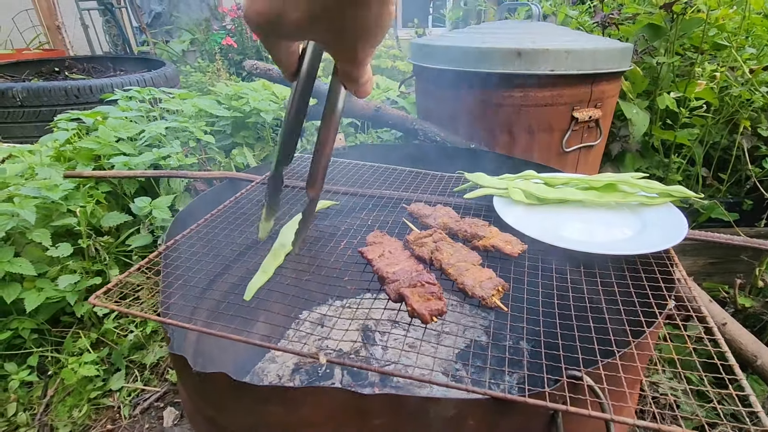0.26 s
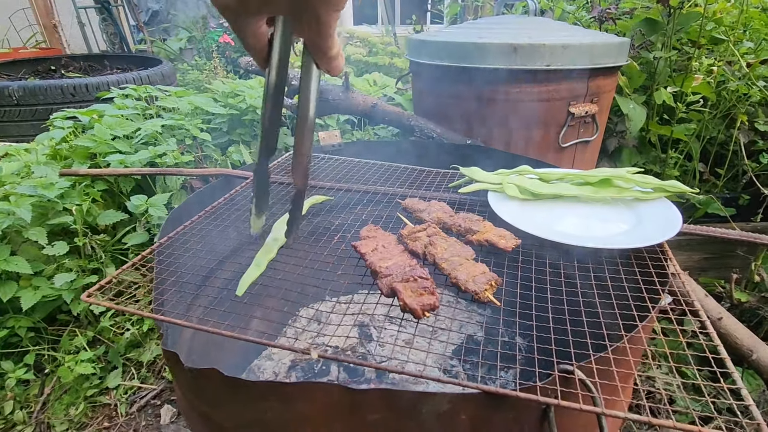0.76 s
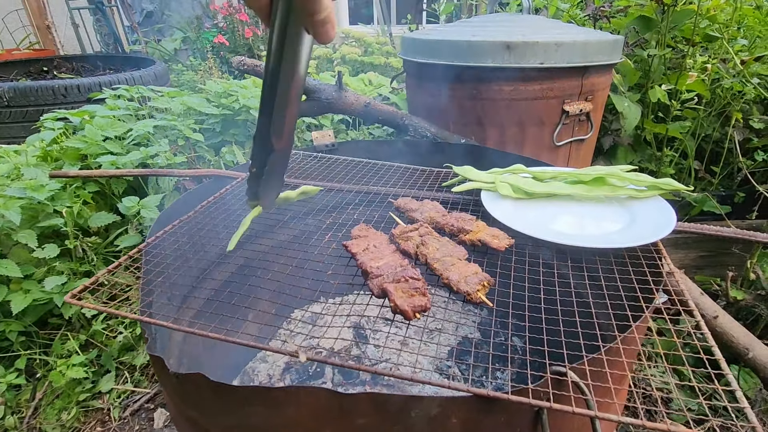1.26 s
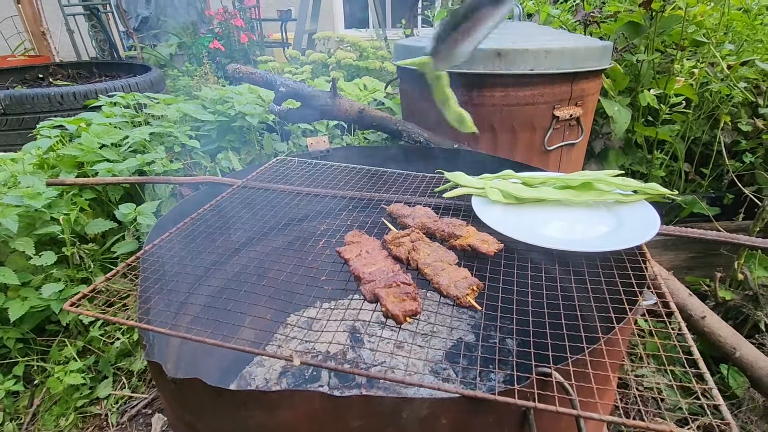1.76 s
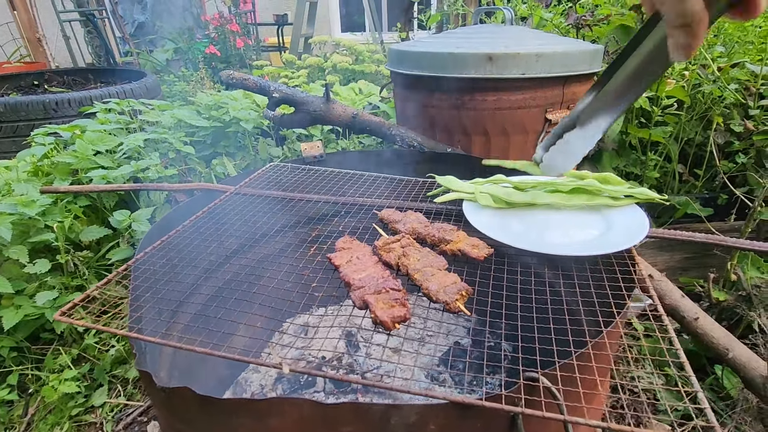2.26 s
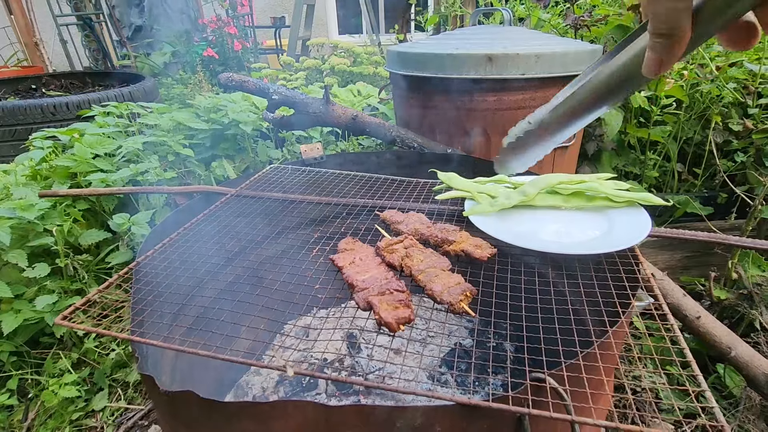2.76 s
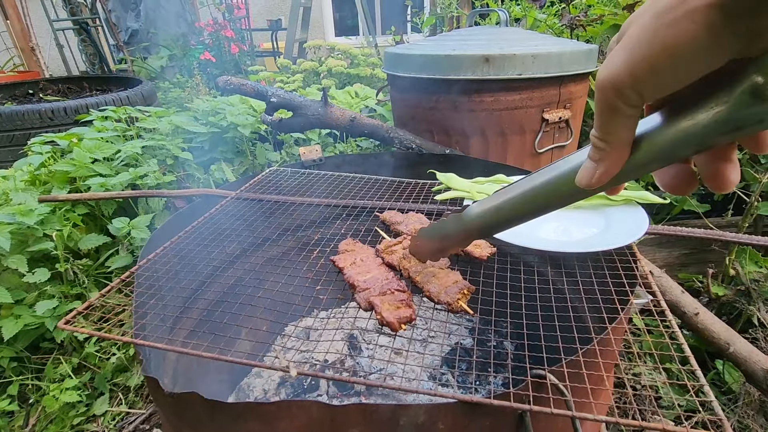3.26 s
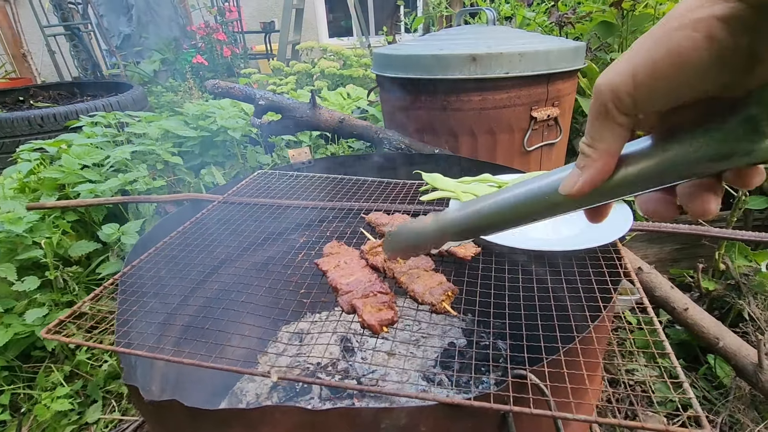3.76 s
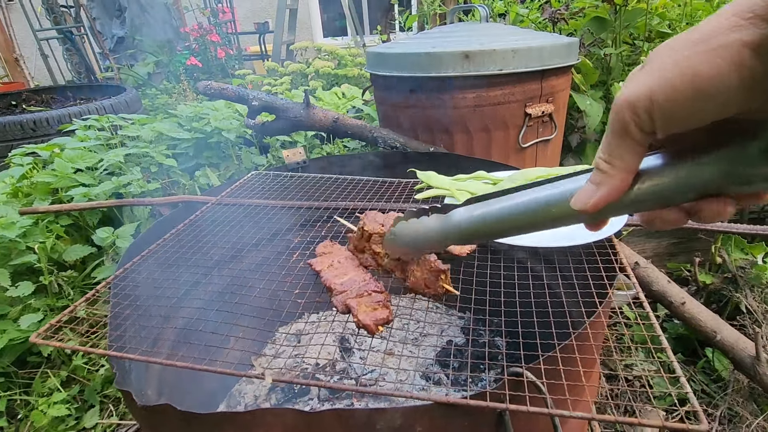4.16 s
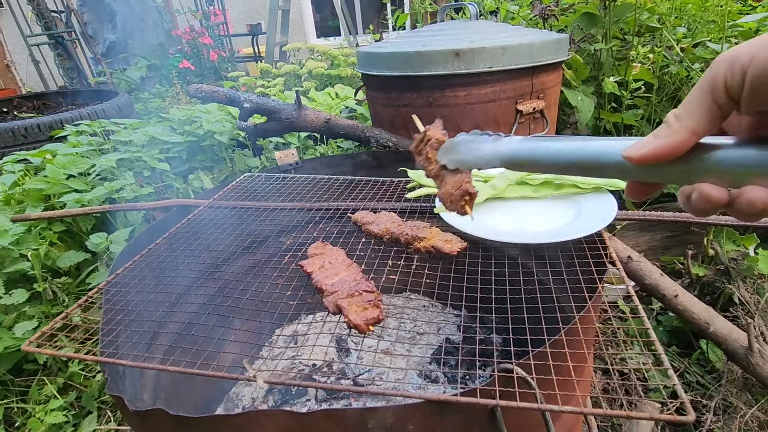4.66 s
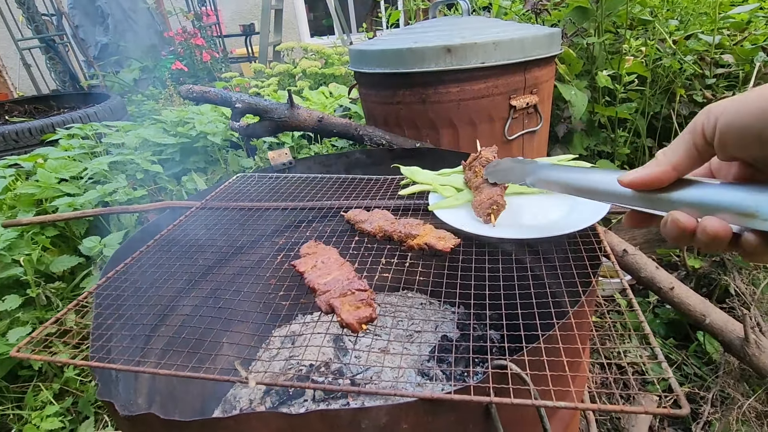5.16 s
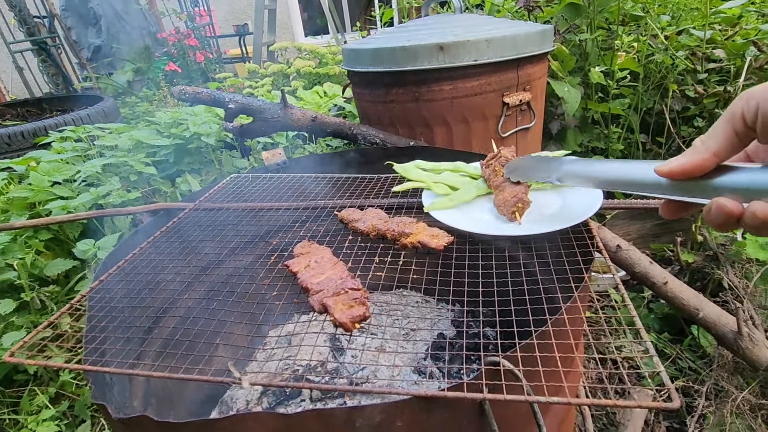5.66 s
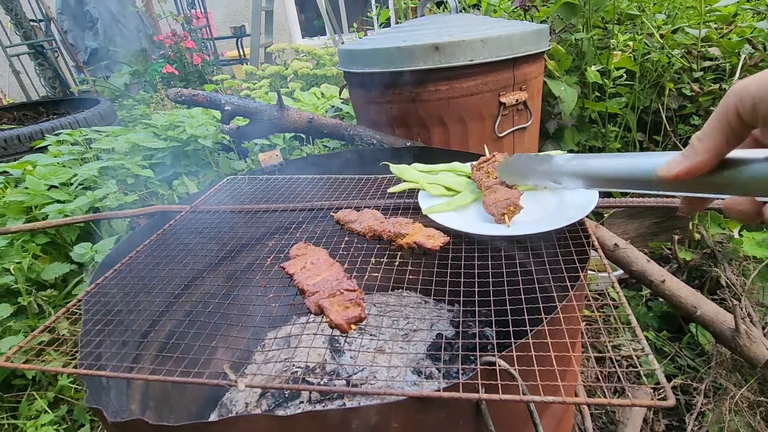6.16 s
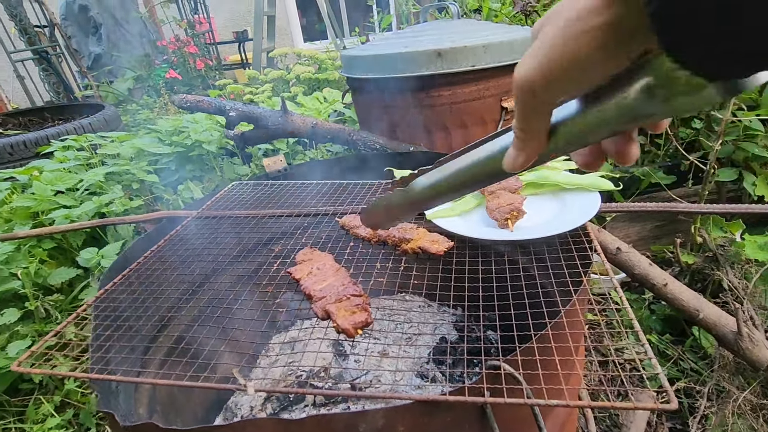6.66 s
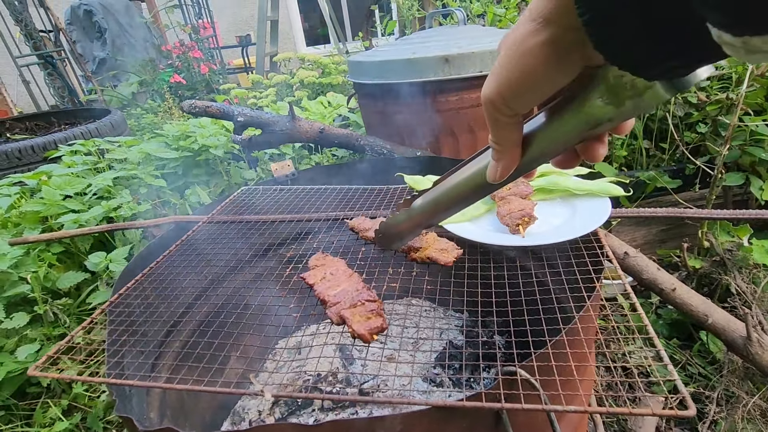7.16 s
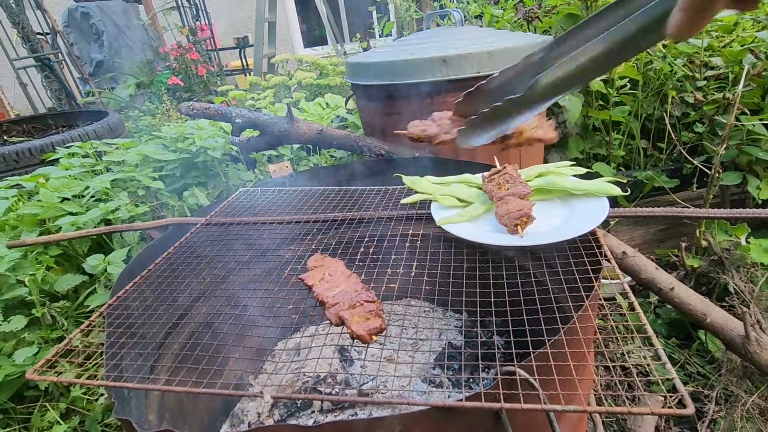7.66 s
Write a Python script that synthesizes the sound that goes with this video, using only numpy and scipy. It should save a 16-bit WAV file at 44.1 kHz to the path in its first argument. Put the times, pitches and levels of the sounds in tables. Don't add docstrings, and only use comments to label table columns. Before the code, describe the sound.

Close in a garden, steel tongs strike a wire rack with a sharp rattling clank, then a second cluster of knocks and jingles, the barrel below booming briefly. Later come a crisp tong clap, light scrapes on wires, two bright plate taps and more scraping. A low hum with a regular faint tick runs underneath, with soft rustling, crickets and distant traffic.

```python
import sys
import numpy as np
from scipy import signal
from scipy.fft import rfft, irfft
from scipy.io import wavfile
from scipy.ndimage import uniform_filter1d

SR = 44100
rng = np.random.default_rng(int(sys.argv[2]) if len(sys.argv) > 2 else 0)


def invert_db(x):
    u = np.asarray(x, float) / 20
    return 10 ** u


def store_pcm(level_fs):
    pcm = np.round(np.clip(level_fs, -1, 1) * 32767).astype(np.int16)
    wavfile.write(sys.argv[1], SR, np.atleast_2d(pcm).T)


N = 349272

# (time [s], blow level [dB], thud re blow [dB], sparkle re blow [dB], rattle t60 [s])
RACK_BLOWS = [(0.193, -40.5, -8, -11, 0.15), (0.204, -39.5, -4, -14, 0.081),
              (0.222, -25.5, -2, -16.5, 0.14), (0.3, -46.5, 8, -37, 0.5), (0.7277, -45.5, 3, -22, 0.11),
              (.92, -53, 0, -10, 0.42), (0.708, -42, 3, -44, 0.12), (0.7469, -40.5, -2.5, -17, 0.27),
              (0.7825, -30, -4, -15.5, 0.14), (0.83, -42, 4.5, -37, 0.32), (0.8688, -43.5, 5.5, -30, 0.25),
              (0.959, -45.5, -1, -5, 0.16), (0.978, -44, -2, -11, 0.17), (0.808, -38, 2, -26, 0.098),
              (1.005, -49, -9, -31, 0.15), (.25, -36, -5, -29, 0.17), (.895, -52.5, 3, -20, 0.19)]
# (frequency [Hz], level [dB], t60 [s])
RACK_MODES = [(958, -2, 0.27), (1184, -20, 5.0), (1696, -9, 0.26), (2099, -9, 0.37), (2218, -12, 0.37),
              (2379, -12, 0.41), (2632, 0, 0.1), (2923, -7, 0.36), (3138, -3, 0.15), (3445, -2, 0.17),
              (4398, -14, 0.28), (4635, -6, 0.14), (5023, -7, 0.13), (5679, -7, 0.14), (6056, -11, 0.12),
              (6982, -16, 0.16), (7590, -15, 0.15), (8554, -29, 0.21), (9119, -24, 0.12), (9318, -23, 0.12),
              (9706, -21, 0.084), (9862, -29, 0.19)]
# (frequency [Hz], level [dB], t60 [s])
TONG_MODES = [(4790, -5, 5.0), (5518, -53, 5.0), (7450, -12, 0.17), (7600, -22, 0.33), (8952, -46, 0.23),
              (9700, -7, 0.082), (10360, 1, 0.12), (10950, -14, 0.032), (12010, 2.5, 0.096),
              (12390, -50, 5.0), (12900, -30, 0.16), (13460, -48, 5.0), (14700, -18, 0.071),
              (12400, -15, 0.031)]
RACK_PIVOTS_HZ = (560, 2770, 12500)
TONG_PIVOTS_HZ = (3100, 7260, 12300)
DRAG_PAN_DB = -0.3


def evened(x):
    return x / np.sqrt(np.mean(x ** 2) + 1e-20)


def read(points, hz):
    f, value = np.transpose(points)
    return np.interp(np.log(hz + 1), np.log(f + 1), value)


def follow(rows):
    s, level_db = np.transpose(rows)
    return np.interp(np.arange(N) / SR, s, level_db)


def sides(pan_db):
    return invert_db(np.array([[pan_db / 2], [-pan_db / 2]]))


def add(mix, s, sound):
    part = mix[:, round(s * SR):][:, :sound.shape[1]]
    part += sound[:, :part.shape[1]]


def placed(rows, pan_db):
    return [(*row, pan_db) for row in rows]


def fuzz(hz, width_hz):
    band_hz = [hz - width_hz / 2, hz + width_hz / 2]
    sos = signal.butter(2, band_hz, "band", fs=SR, output="sos")
    return evened(signal.sosfilt(sos, rng.standard_normal((2, N))))


def noise(spectrum, patchy_db, flicker_db):
    # (frequency [Hz], correlation [0-1])
    likeness = [(60, 1), (130, 0.89), (290, 0.77), (640, 0.016), (15000, 0.035)]
    frames, hz = N // 256 + 5, np.fft.rfftfreq(1024, 1 / SR)
    a, b, c, d, patches = rng.standard_normal((frames, 513, 5)).T
    patches = uniform_filter1d(patches, size=12, axis=0)
    patches = evened(uniform_filter1d(patches, size=12, axis=1))
    flicker = evened(uniform_filter1d(rng.standard_normal(frames), size=3))
    same = np.clip(read(likeness, hz), -1, 1)[:, None]
    left = a + 1j * b
    right = same * left + np.sqrt(1 - same ** 2) * (c + 1j * d)
    level_db = read(spectrum, hz)[:, None] + patchy_db * patches + flicker_db * flicker
    z = np.array([left, right]) * invert_db(level_db)
    return evened(signal.istft(z, nperseg=1024, noverlap=768)[1][:, :N])


def ring(modes, spread_db, longest_s, size=22050):
    hz, db, t60 = np.transpose(modes)[:, None, :, None]
    t = np.arange(size) / SR
    apart = np.minimum(hz / 2500, 1)
    luck = rng.standard_normal((2, len(modes), 1))
    phase = rng.random((2, len(modes), 1))
    fading_db = db + spread_db * apart * luck - 60 * t / np.clip(t60, .01, longest_s)
    contact = np.minimum(t / 0.002, 1)
    return contact * (invert_db(fading_db) * np.sin(2 * np.pi * (hz * t + phase * apart))).sum(1)


def strike(rows, modes, pivots_hz, longest_s, mesh_db, mesh_t60_s, chatter_per_s, size, rise_s=0):
    # (frequency [Hz], left-right [dB])
    shading = [(250, -6), (600, 5), (2000, 0), (4500, -5), (8000, -6.5), (12000, 7)]
    treble_hz, treble_share = 7200, 3.8
    out = np.zeros((2, N))
    t = np.arange(size) / SR
    hz = np.fft.rfftfreq(2 * size, 1 / SR)
    for s, db, low_db, high_db, rattle_s, pan_db in rows:
        contacts = (rng.random(size) < chatter_per_s / SR) * rng.standard_normal(size)
        contacts = contacts * invert_db(-60 * t / max(rattle_s, .004))
        contacts[0] = 1
        contacts *= np.minimum((t + .002) / (rise_s + .002), 1)

        mesh = rng.standard_normal((2, size)) * invert_db(mesh_db - 60 * t / mesh_t60_s)
        mesh = signal.lfilter(*signal.butter(1, 900, "high", fs=SR), mesh)
        apart = signal.lfilter(*signal.butter(2, 600, "high", fs=SR), 1.26 * mesh[1] - mesh[0])
        mesh[1] = mesh[0] + apart
        buzz = evened(uniform_filter1d(rng.standard_normal(size), size=130))
        mesh *= invert_db(1.5 * buzz)

        bent = np.array(modes) * [1 + .006 * rng.standard_normal(), 1, 1]
        body = ring(bent, spread_db=4.5, longest_s=longest_s, size=size)
        body = body / np.abs(body).max() + mesh
        colour_db = read([(120, low_db), *zip(pivots_hz, (low_db, 0, high_db))], hz)
        colour_db = colour_db + np.outer([.5, -.5], read(shading, hz))
        whole = rfft(body, 2 * size) * rfft(contacts, 2 * size) * invert_db(colour_db)
        treble = irfft(whole / (1 + (treble_hz / (hz + 1)) ** 4))[:, :size]
        treble_fade = invert_db(-60 * t / (treble_share * rattle_s + 0.083))
        sound = irfft(whole)[:, :size] - treble * (1 - treble_fade)
        peak_power = uniform_filter1d((sound ** 2).mean(0), size=300).max()
        sound *= invert_db(db - 6.0) / np.sqrt(peak_power)
        add(out, s, sound * sides(pan_db))
    return out


def machine():
    # (frequency [Hz], level [dB])
    shaft_tones = [(56.98, 0), (58.02, -1.6), (58.38, -6.7), (59.03, -.8)]
    # (frequency [Hz], width [Hz], level [dB])
    casing_modes = [(181.4, 14, -70), (232.1, 26.2, -62.5), (340, 101, -72.5), (713, 32, -79.5)]
    hum_hz, hum_db, overtone_db, shaft_db = 120.01, -46, -70, -59
    in_step_s = 6.625
    t = np.arange(N) / SR
    tones = invert_db(hum_db) * np.sin(2 * np.pi * hum_hz * t)
    tones += invert_db(overtone_db) * np.sin(2 * np.pi * 2 * hum_hz * t)
    for hz, db in shaft_tones:
        tones += invert_db(shaft_db + db) * np.cos(2 * np.pi * hz * (t - in_step_s))
    casing = sum(invert_db(db) * fuzz(hz, width_hz) for hz, width_hz, db in casing_modes)
    return np.sqrt(2) * tones * sides(1.0) + casing[0] + 0.13 * casing[1] * np.array([[1], [-1]])


def still_air():
    # (frequency [Hz], level per Hz [dB])
    air_spectrum = [(12, -61), (20, -18), (68, 8), (123, -8.5), (146, -17), (172, -15.5), (234, -12.5),
                    (485, -32), (698, -22.5), (802, -49), (3740, -59), (4670, -41), (8890, -99),
                    (14300, -99), (16000, -76)]
    return invert_db(-53) * noise(air_spectrum, patchy_db=1.0, flicker_db=-3.5)


def snaps(per_s, spread_db):
    size = invert_db(spread_db * np.minimum(rng.exponential(1, (2, N)), 5))
    size = size * (rng.random((2, N)) < per_s / SR)
    snap = rng.standard_normal(400) * invert_db(-60 * np.arange(400) / SR / 0.012)
    leaky = size + .5 * size[::-1]
    return evened(np.diff(signal.oaconvolve(leaky, snap[None], axes=1))[:, :N])


def rustle():
    # (time [s], level [dB])
    arm_effort = [(0, -78.5), (.45, -74), (.66, -87), (1.1, -76), (1.65, -75), (2.0, -81.5), (2.2, -73.5),
                  (2.45, -82.5), (2.85, -80), (3.6, -86), (4.4, -82.5), (4.68, -75.5), (5.2, -88.5),
                  (5.55, -82), (5.85, -86.5), (6.2, -74.5), (7.0, -79.5), (7.92, -75)]
    # (frequency [Hz], level [dB])
    top_spectrum = [(900, -53), (2500, -26), (5500, -0.5), (8000, 5.5), (9000, 1.5), (15000, 2.5),
                    (16000, -51)]
    body_spectrum = [(500, -41.5), (1500, -6), (3500, -7.5), (6000, -10.5), (9000, -27)]
    rest_db, rest_body_db, body_share = -77.5, -74.5, 0.78
    top_db = follow(arm_effort)
    body_db = rest_body_db + body_share * (top_db - rest_db)
    out = invert_db(top_db + 2.0) * noise(top_spectrum, patchy_db=2.0, flicker_db=2.5) * sides(1.17)
    out += invert_db(top_db - 21.5) * snaps(per_s=73, spread_db=-6.0)
    out += invert_db(body_db + 3.0) * noise(body_spectrum, patchy_db=3.5, flicker_db=1.0) * sides(-0.085)
    return out


def traffic():
    # (time [s], level [dB])
    road_swell = [
        (0, -68.5),
        (1.3, -65.5),
        (2.5, -69.5),
        (3.3, -68),
        (5.4, -70),
        (6.6, -68.5),
        (7.1, -60.5),
        (7.5, -67),
        (7.92, -61),
    ]
    # (frequency [Hz], level [dB])
    road_spectrum = [(200, 10.5), (450, -5.5), (900, -0.5), (1500, -7.5), (2500, -46)]
    road = noise(road_spectrum, patchy_db=0.5, flicker_db=1.5)
    return invert_db(follow(road_swell) + 3.5) * road * sides(2.8)


def motor_whine():
    # (frequency [Hz], level [dB])
    whine_tones = [(409.1, -73), (1028, -80), (1125, -80), (1233, -82), (1432, -79), (1529, -80),
                   (1723, -84)]
    # (time [s], level [dB])
    whine_swell = [
        (0, -40),
        (6.8, -30),
        (7.1, 0),
        (7.4, 1),
        (7.92, -1),
    ]
    return invert_db(follow(whine_swell)) * sum(invert_db(db) * fuzz(hz, 6.9) for hz, db in whine_tones)


def insect_chorus():
    # (time [s], level [dB])
    chorus_swell = [
        (0, -85),
        (.7, -78.5),
        (1.3, -77.5),
        (7.92, -75.5),
    ]
    waver = evened(uniform_filter1d(rng.standard_normal(N), size=3000))
    return invert_db(follow(chorus_swell) - 3.5) * fuzz(4750, 330) * sides(-13.0) * invert_db(1.73 * waver)


def tong_clicks():
    # (time [s], level [dB], sparkle re click [dB], left-right [dB])
    click_events = [(0.061, -60, -3, 16), (1.11, -55, -2, 10), (1.098, -58, -4, 12), (1.1448, -57, -4, 18),
                    (1.175, -54, -17, 4), (1.4504, -50.5, -9, 0), (1.608, -61, -24, -11),
                    (1.704, -60.5, -24, -14), (1.948, -48.5, -1, 9), (2.058, -61.5, -14, -10),
                    (2.37, -64, -20, -5), (2.7065, -60, -28, -6), (2.941, -55, 0, 1), (3.286, -44.5, 8, 20),
                    (3.7097, -62, -4, 2), (3.686, -72, -20, 2), (3.392, -60, 5, 0), (3.41, -58.5, -2, 0),
                    (3.702, -67, -1, -6), (3.897, -46, -8, 6), (4.042, -61, -9, 2), (4.178, -56, -23, 10),
                    (4.968, -64.5, -31, -15), (5.703, -55.5, 5, 3), (5.799, -61, 1, 3),
                    (5.894, -73, -4, -2), (6.1168, -61, 2, -7), (6.1464, -62, 0, -4), (6.228, -58, -4, -17),
                    (6.243, -60, 14, -5), (6.318, -58.5, -11, -13), (6.493, -60, -11, -4),
                    (7.1702, -56.5, 1, -16), (7.431, -53.5, -4, -4), (7.5484, -56.5, 1, -12),
                    (7.717, -72, -30, 2)]
    thud_db, rattle_s = -13, .014
    clicks = [(s, db, thud_db, high_db, rattle_s, pan_db) for s, db, high_db, pan_db in click_events]
    return strike(clicks, TONG_MODES, TONG_PIVOTS_HZ, longest_s=.016, mesh_db=1, mesh_t60_s=.009,
                  chatter_per_s=300, size=3000)


def cricket():
    # (start [s], length [s], level [dB], first pitch [Hz])
    bursts = [(0.097, 0.22, -75, 4300), (1.064, 0.24, -69, 4530), (1.368, .12, -74, 4330),
              (2.152, 0.26, -74, 4400), (3.078, 0.15, -72, 4430), (3.328, 0.13, -75, 4260),
              (4.55, 0.22, -75, 4400), (5.28, 0.2, -77, 4420), (6.102, 0.23, -79, 4440),
              (6.882, 0.3, -71, 4290), (7.555, 0.24, -78, 4420)]
    sag_hz_per_s, blur_hz, syllables_per_s = 1200, 90, 14.7
    out = np.zeros((2, N))
    for s, length_s, db, hz in bursts:
        t = np.arange(0, length_s, 1 / SR)
        a, b = rng.standard_normal((SR // 2, 2, 2)).T[..., :len(t)]
        blur = signal.lfilter(*signal.butter(2, blur_hz, fs=SR), a + 1j * b)
        turns = hz * t - sag_hz_per_s * t ** 2 / 2
        whistle = evened((blur * np.exp(2j * np.pi * turns)).real)
        throb = 0.47 + np.sin(np.pi * syllables_per_s * t) ** 2
        add(out, s, invert_db(db) * np.sin(np.pi * t / length_s) * throb * whistle * sides(1.4))
    return out


def wire_pings():
    # (time [s], level [dB], frequency [Hz], t60 [s], left-right [dB])
    ping_events = [(.172, -68, 2180, .13, 0), (.635, -72, 10500, .15, 16), (.757, -52, 5140, .045, -9),
                   (.974, -47, 5030, .07, 2), (3.2835, -51, 3620, .025, 6), (3.308, -63, 2110, .1, 1),
                   (3.329, -75, 5850, .12, -11), (3.885, -66, 3480, .08, -9), (4.385, -54, 3340, .016, -8),
                   (5.598, -56, 5400, .13, 1), (5.984, -59, 4290, .25, -5), (5.589, -62, 6050, .07, 0),
                   (5.597, -64, 4330, .15, 0), (3.218, -67, 760, .06, 0), (5.985, -62, 5540, .15, 7),
                   (6.861, -58, 3640, .07, -10), (.224, -44, 2640, .05, -4), (7.126, -57, 2050, .09, 1),
                   (.713, -48, 2060, .1, -4), (.415, -64, 1040, .09, 3), (.226, -52, 576, .3, 2),
                   (.226, -54, 958, .25, 0), (.226, -54, 3445, .18, -4), (.224, -55, 5679, .12, -5),
                   (.224, -56, 5017, .13, -5), (.224, -58, 1620, .1, 0), (.26, -60, 1150, .3, 0),
                   (.786, -58, 3128, .18, -4), (.8, -55, 3420, .16, -4), (.786, -58, 6191, .09, -5),
                   (.786, -60, 576, .35, 2), (.962, -63, 5810, .08, -3), (3.2832, -47, 12840, .02, 8),
                   (3.2858, -47, 14030, .02, 8), (3.2858, -50, 12300, .02, 8), (3.2832, -55, 7700, .02, 6),
                   (5.597, -58, 6050, .1, 0), (4.3855, -56, 3900, .015, -8), (4.303, -60, 1560, .03, 0),
                   (1.735, -70, 2180, .1, 0)]
    blur = 5.5
    out = np.zeros((2, N))
    for s, db, hz, t60_s, pan_db in ping_events:
        wires = [(hz + blur * near / t60_s, 0, t60_s) for near in rng.uniform(-1, 1, 4)]
        ping = ring(wires, spread_db=1.5, longest_s=.4, size=14700)
        ping = ping[0] + .4 * ping
        add(out, s, invert_db(db + 4) * ping / np.abs(ping).max() * sides(pan_db))
    return out


def rack_blows():
    return strike(placed(RACK_BLOWS, 0.5), RACK_MODES, RACK_PIVOTS_HZ, longest_s=.1, mesh_db=3.5,
                  mesh_t60_s=.085, chatter_per_s=900, size=14700)


def barrel():
    # (frequency [Hz], level [dB], t60 [s])
    barrel_modes = [(164, 7, 0.15), (213, -4, 0.35), (257, -12, 0.43), (314, -10, 0.35), (342, -1, 0.4),
                    (365, -4.5, 0.22), (424, -12, 0.16), (473, -16, 0.14), (568, -6, 0.36), (604, 0, 0.2),
                    (692, -9, 0.15), (1080, -7, 0.4)]
    out = np.zeros((2, N))
    for s, db, low_db, *_ in RACK_BLOWS:
        boom = ring(barrel_modes, spread_db=6.0, longest_s=.33)
        add(out, s, invert_db(db + low_db - 14.0) * boom)
    return out


def arm_jingles():
    # (frequency [Hz], level [dB], t60 [s])
    arm_modes = [(5100, -2, .03), (6900, -4, .04), (7400, -2, .04), (8300, -3, .03), (9450, 0, .04),
                 (10990, 0, .04), (11510, 2, .05), (11960, 2, .06), (13050, 2, .04), (14050, -4, .04),
                 (15480, -4, .04)]
    jingle_events = [
        (.1935, -41, -9, -24, .04),
        (.736, -55, -5, 0, .1),
        (.7475, -37.5, 6, 0, .03),
        (.7585, -40.5, 0, -3, .03),
        (.845, -58, -15, 0, .02),
        (.9597, -49, 0, 0, 0.067),
        (.9767, -50, -5, 2, 0.095),
    ]
    return strike(placed(jingle_events, 4.5), arm_modes, TONG_PIVOTS_HZ, longest_s=.06, mesh_db=-17.0,
                  mesh_t60_s=0.018, chatter_per_s=160, size=5000)


def fan_ticks():
    # (time [s], level [dB])
    tick_events = [(1.3566, -55.5), (1.951, -57.5), (2.5496, -61), (3.132, -59), (3.7107, -58.5),
                   (4.3056, -63), (4.9005, -57), (5.497, -61), (6.0822, -50), (6.6794, -58), (7.2597, -50)]
    # (frequency [Hz], level [dB], t60 [s])
    tick_modes = [(1510, -12, .04), (1630, -10, .04), (1720, -12, .03), (1900, -16, .03), (2100, -12, .04),
                  (2218, -9, .05), (2260, 0, .016), (2350, -10, .05), (2480, -15, .03)]
    rise_s, slap_s, slap_db = .003, .03, -14
    brush_hz, brush_width_hz, brush_db, brush_t60_s = 5520, 780, -21, 0.29
    out = np.zeros((2, N))
    hiss = fuzz(brush_hz, brush_width_hz)
    t = np.arange(6000) / SR
    for s, db in tick_events:
        tick = ring(tick_modes, spread_db=1.5, longest_s=.1, size=len(t)) * np.minimum(t / rise_s, 1)
        tick = tick / np.abs(tick).max()
        brush = hiss[:, round(s * SR):][:, :len(t)] * invert_db(brush_db - 60 * t / brush_t60_s)
        add(out, s, invert_db(db + 7.5) * (tick * sides(1.2) + brush))
        add(out, s + slap_s, invert_db(db + 11.5 + slap_db) * tick[::-1])
    return out


def tong_claps():
    clap_events = [
        (2.518, -55, 6.9, 4, 0.083),
        (2.5436, -38.5, 1.9, 9.7, 0.029),
    ]
    return strike(placed(clap_events, DRAG_PAN_DB), TONG_MODES, TONG_PIVOTS_HZ, longest_s=0.087,
                  mesh_db=-10.5, mesh_t60_s=0.17, chatter_per_s=510, size=9000, rise_s=0.0023)


def scrapes():
    scrape_events = [(2.552, -56, -9, -20, 0.56), (3.286, -57, 2, -33, 0.24), (3.876, -56.5, -27, 1, 0.33),
                     (4.095, -49, -7, -6, 0.35), (3.27, -65, -30, 19, .2), (4.3, -58.5, -19, -28, 0.54),
                     (4.125, -50, -9, -5, .15), (4.109, -47, -3, -7, 0.41), (4.1657, -50, 22, -34, 0.25),
                     (4.1982, -54.5, 17, -15, 0.75), (5.55, -58.5, -21, 8, 0.68), (5.99, -51, -28, -0.5, 1),
                     (6.63, -53, -2, -3, 1), (6.6648, -53, 13, -8, 0.41), (6.7505, -52, 29, 5, 0.057),
                     (6.862, -54.5, -25, -5, 0.033), (6.979, -47, 12.5, -9.5, 0.35),
                     (7.0478, -47.5, -25, -6, 0.3), (7.0683, -53, -9, 2, 0.074),
                     (7.1254, -50, -1, -41, 0.37)]
    return strike(placed(scrape_events, DRAG_PAN_DB), RACK_MODES, RACK_PIVOTS_HZ, longest_s=0.025,
                  mesh_db=6, mesh_t60_s=0.022, chatter_per_s=900, size=14700, rise_s=.006)


def wire_catches():
    catch_events = [(4.0957, -52, -10, -6, .02), (4.1112, -48, -10, 3, .02), (4.1675, -60, -25, 12, .006),
                    (4.188, -62, -20, 8, .005), (4.144, -61, -15, 0, .01), (4.3852, -53, -1, -12, .004),
                    (6.6647, -48, 1, -1, .02), (6.752, -63, -10, -1, .01), (6.8567, -65, -15, -10, .02),
                    (6.978, -69, -15, -16, 0.017), (7.01, -57, -5, -16, .03), (7.1, -59, -3, -12, .03),
                    (6.875, -62, -10, -8, 0.017), (6.988, -58, -15, 3, .008), (7.0483, -53, -20, -7, .01),
                    (7.0683, -45, -20, 3, 0.0092), (7.073, -59, -20, -2, .008), (7.081, -58, -20, 0, .008),
                    (6.03, -62, -25, -5, .03), (6.058, -61, -25, 4, 0.056)]
    return strike(placed(catch_events, DRAG_PAN_DB), RACK_MODES, RACK_PIVOTS_HZ, longest_s=.012,
                  mesh_db=6, mesh_t60_s=.008, chatter_per_s=400, size=2000)


def plate_taps():
    # (frequency [Hz], level [dB], t60 [s])
    plate_modes = [(3456, -8, 0.1), (4290, -12, 0.1), (5400, -4, 0.08), (6000, -10, .04), (6900, -1, 0.057),
                   (7840, -4, 0.041), (8300, 1, 0.026), (10000, -1, 0.033), (10560, -8, 0.04),
                   (11300, -5, 0.045), (11600, -9, 0.057), (14400, -5, 0.032)]
    tap_events = [
        (5.5955, -36.5, -15, 1, 0.11),
        (5.9835, -42, -28, 0, 0.091),
    ]
    return strike(placed(tap_events, 2.5), plate_modes, TONG_PIVOTS_HZ, longest_s=.1, mesh_db=-5.0,
                  mesh_t60_s=.03, chatter_per_s=120, size=6000)


def wire_squeal():
    start_s, length_s, level_db, hz, width_hz = 6.79, .3, -69, 1580, 130
    out = np.zeros((2, N))
    stroke = signal.windows.tukey(round(length_s * SR), .5)
    add(out, start_s, invert_db(level_db) * stroke * fuzz(hz, width_hz)[:, :len(stroke)])
    return out


def walls(x, t60_s, top_hz):
    t = np.arange(round(.5 * SR)) / SR
    taps = rng.choice([-1., 1.], (2, len(t))) * (rng.random((2, len(t))) < 1500 / SR) * (t > .008)
    taps = signal.lfilter(*signal.butter(1, top_hz, fs=SR), taps * invert_db(-60 * t / t60_s))
    return signal.fftconvolve(x, taps / np.linalg.norm(taps[0]), axes=1)[:, :N]


def scene():
    garden = still_air() + rustle() + traffic() + motor_whine() + insect_chorus() + cricket()
    near = tong_clicks() + wire_pings() + rack_blows() + barrel() + arm_jingles()
    near += tong_claps() + scrapes() + wire_catches() + plate_taps() + wire_squeal()
    far = fan_ticks()
    echoes = walls(invert_db(-19) * near, t60_s=.25, top_hz=5000)
    echoes += walls(invert_db(-10) * far, t60_s=.33, top_hz=4000)
    return near + far + echoes + machine() + garden


def band_limit(x):
    return signal.sosfilt(signal.butter(12, 16490, fs=SR, output="sos"), x)


def record(dry):
    # (frequency [Hz], level [dB])
    overall_response = [(20, 0), (7900, 0), (8400, -5), (15550, -5), (15800, -30), (22050, -60)]
    hz = np.linspace(0, SR / 2, 1025)
    colour = signal.firwin2(1023, hz, invert_db(read(overall_response, hz)), fs=SR)
    return band_limit(signal.oaconvolve(dry, colour[None], "same", axes=1))


dry = scene()
out = record(dry)
store_pcm(out)
```